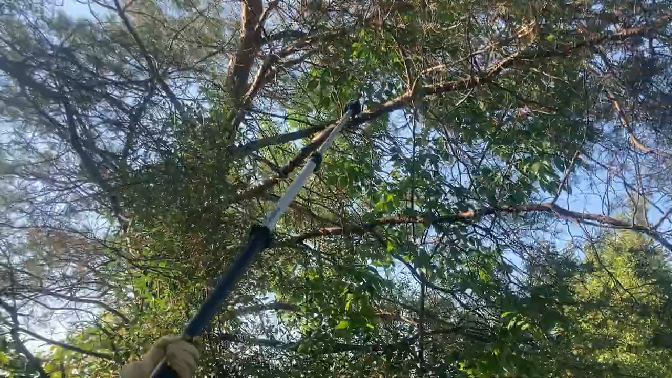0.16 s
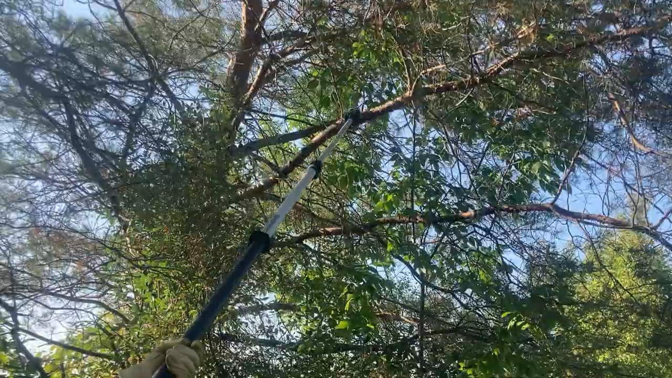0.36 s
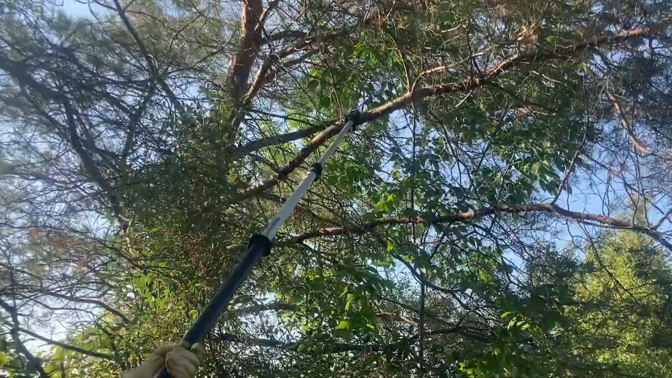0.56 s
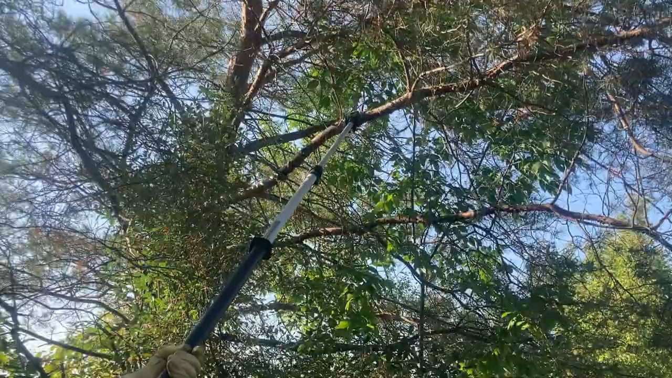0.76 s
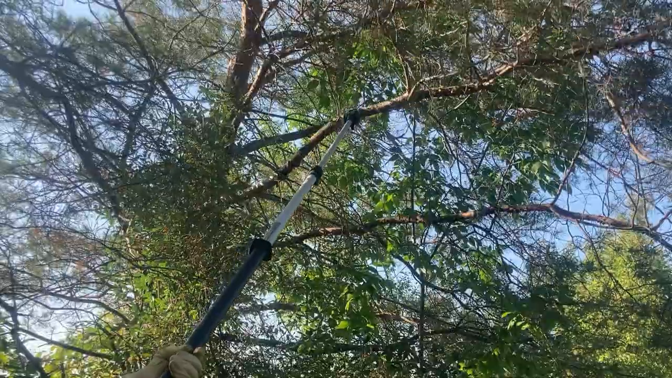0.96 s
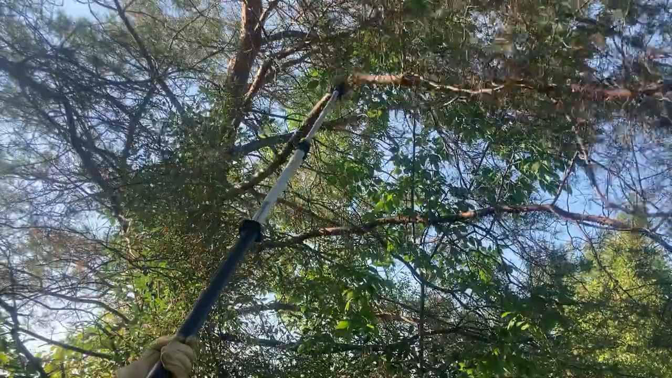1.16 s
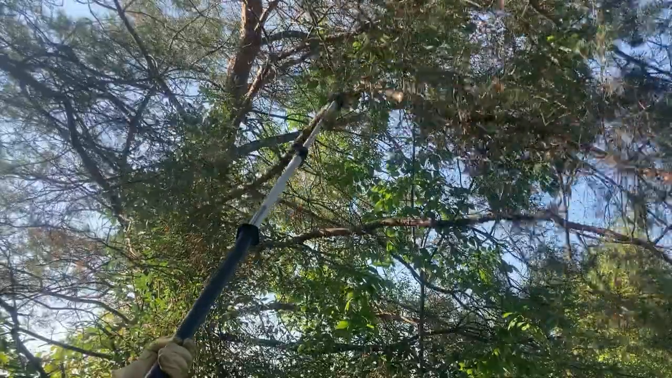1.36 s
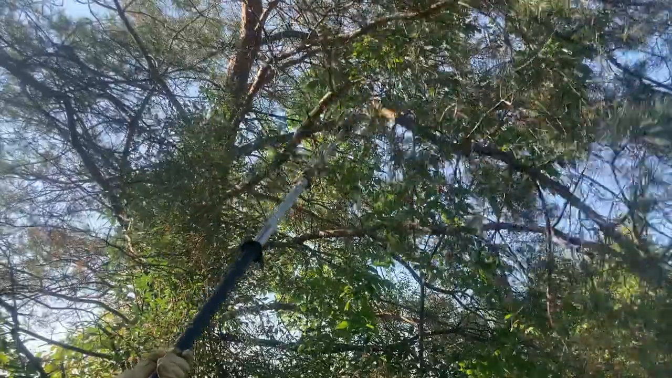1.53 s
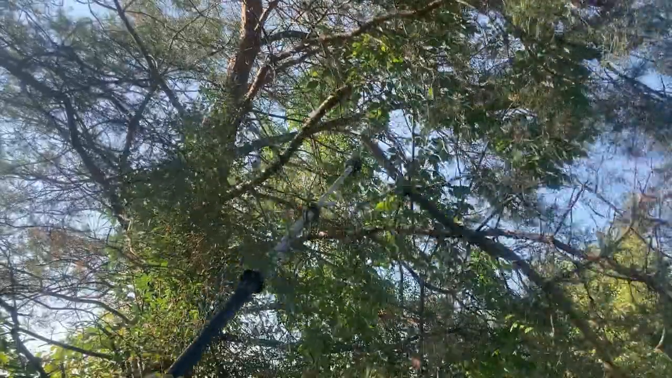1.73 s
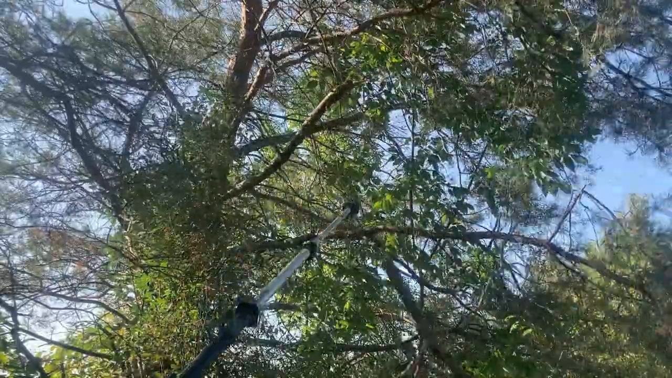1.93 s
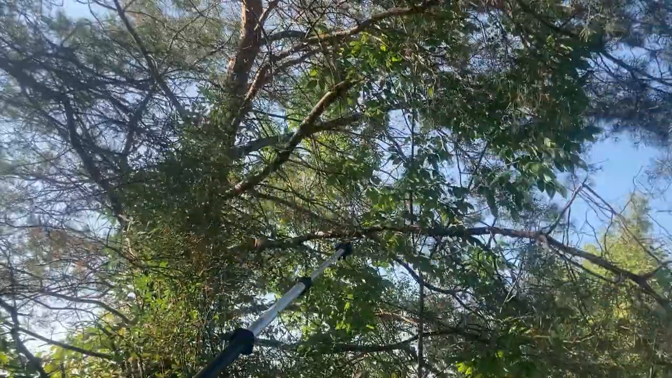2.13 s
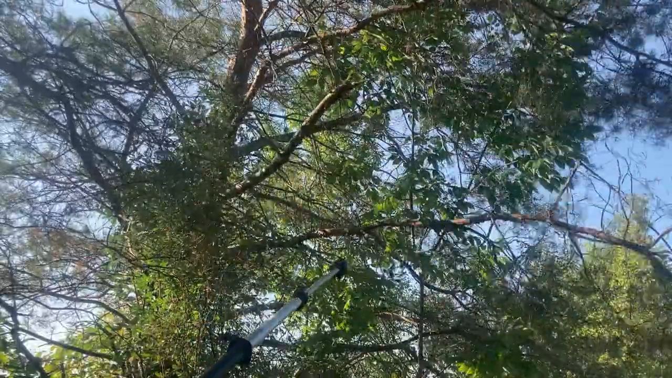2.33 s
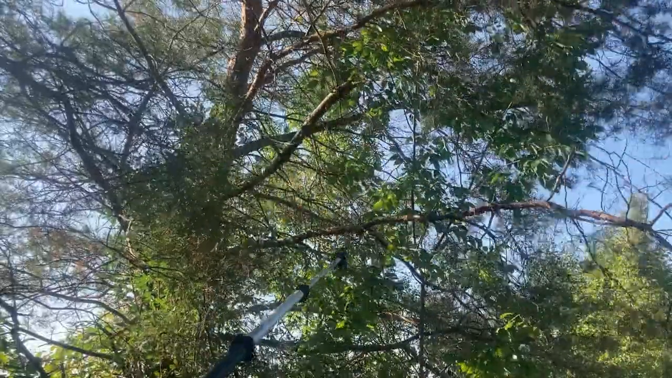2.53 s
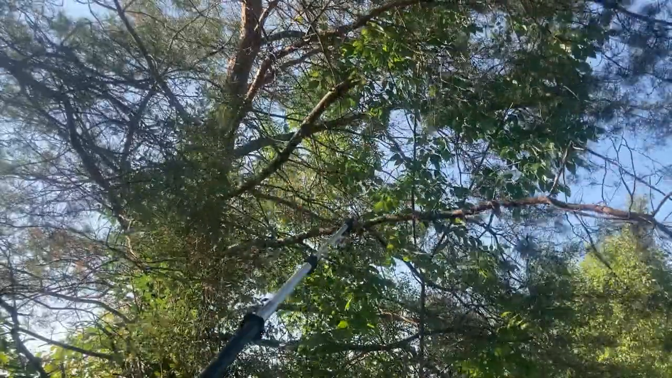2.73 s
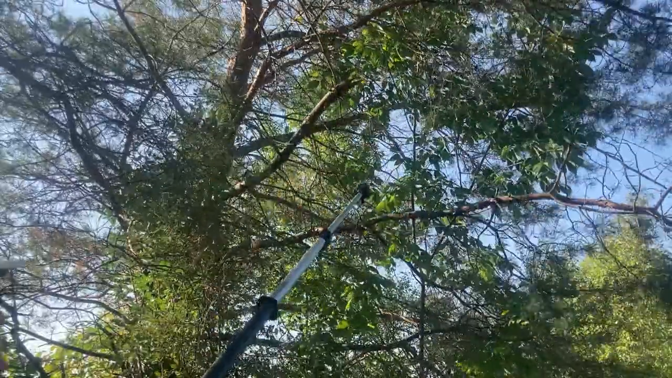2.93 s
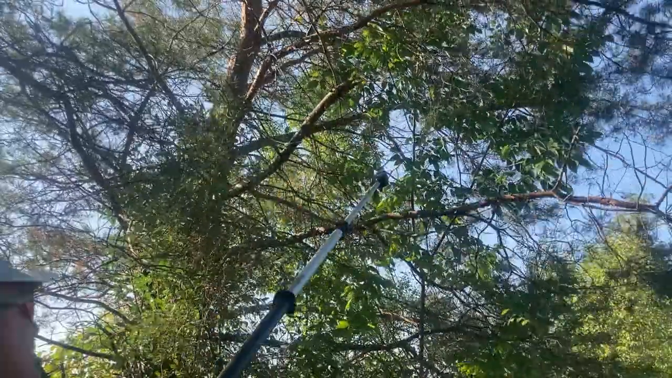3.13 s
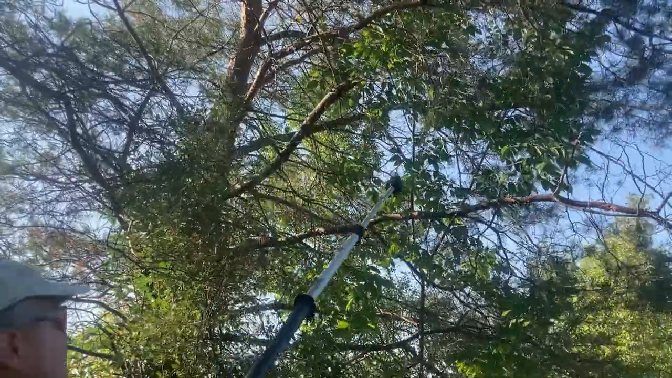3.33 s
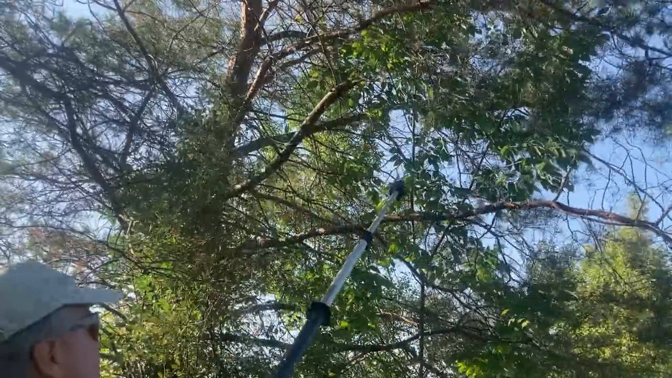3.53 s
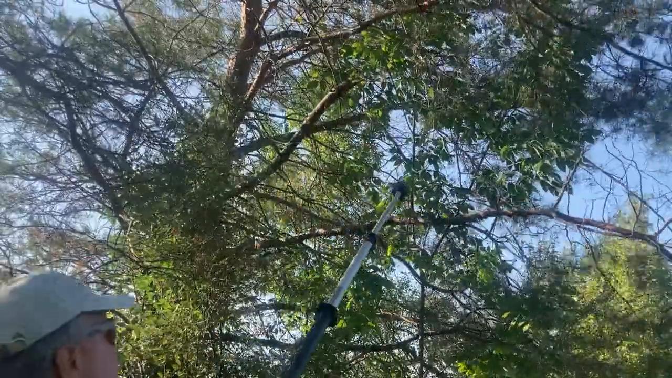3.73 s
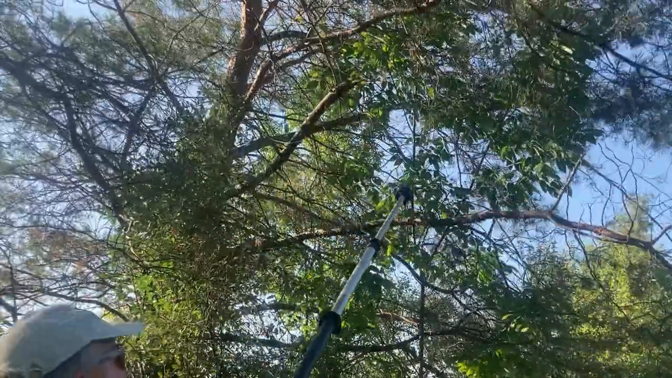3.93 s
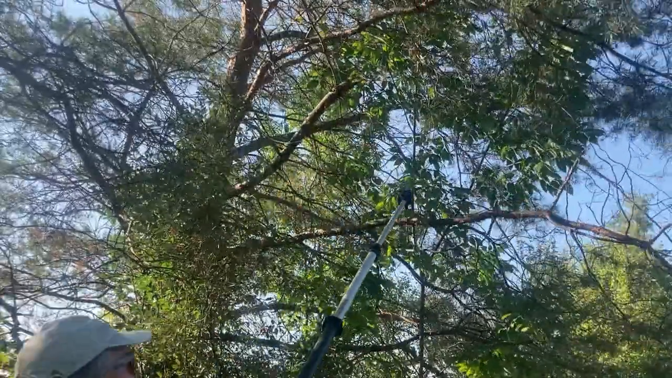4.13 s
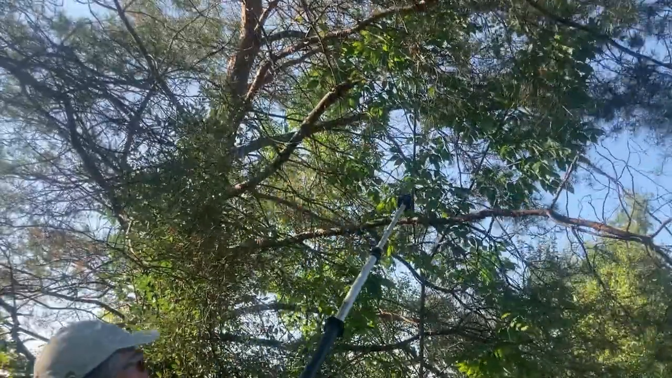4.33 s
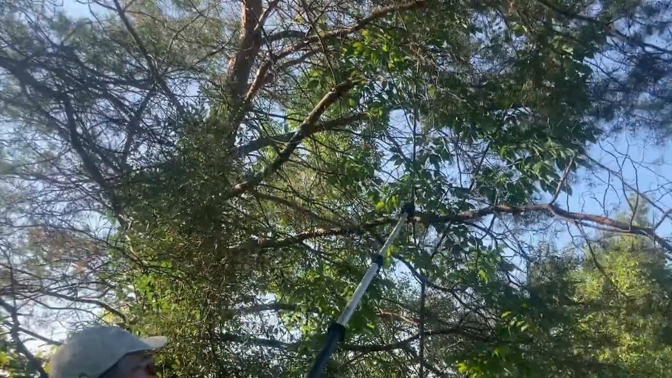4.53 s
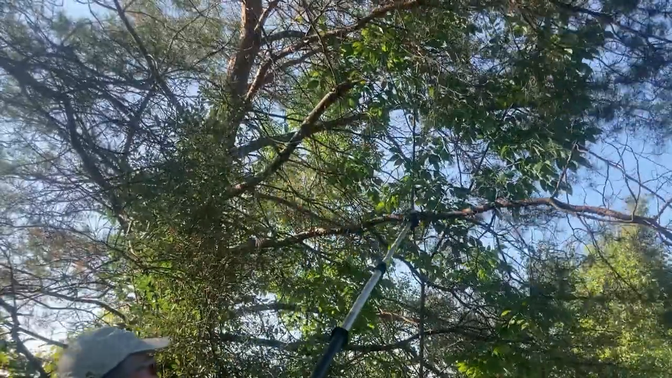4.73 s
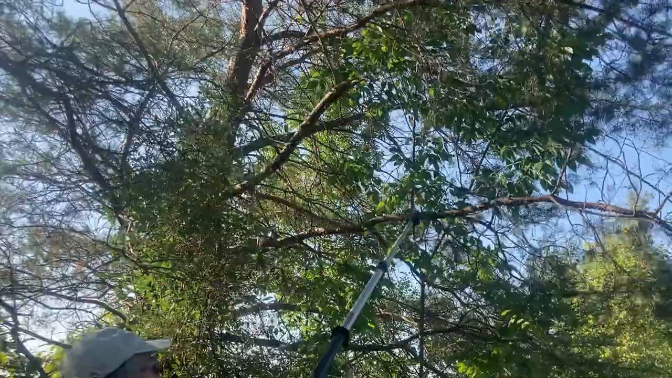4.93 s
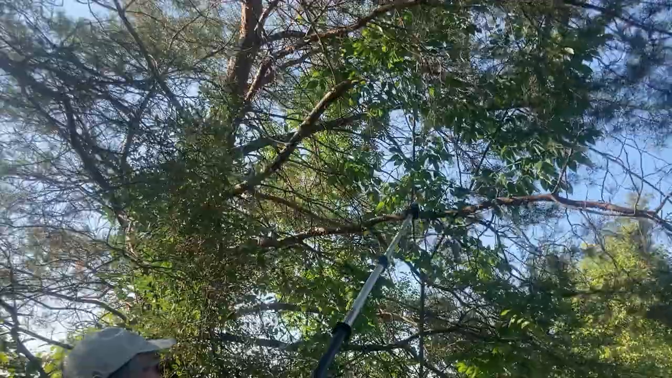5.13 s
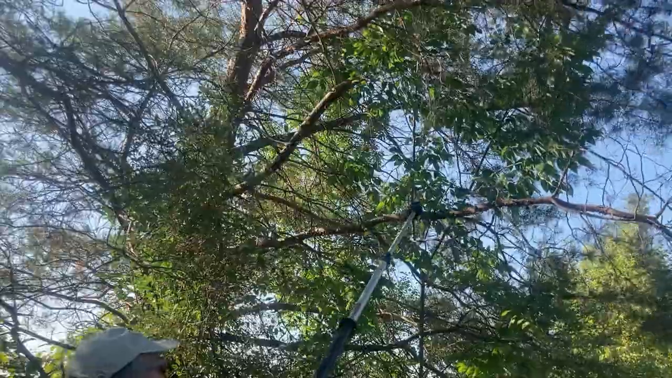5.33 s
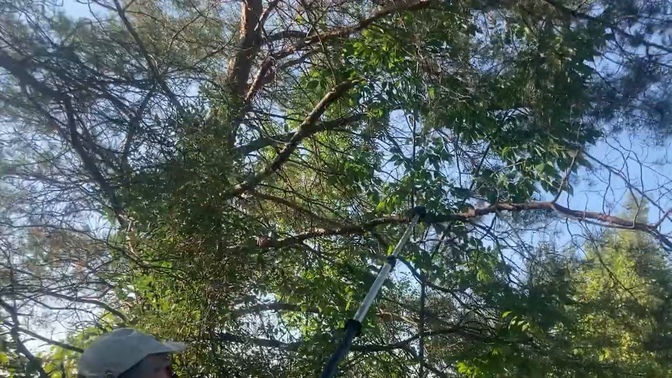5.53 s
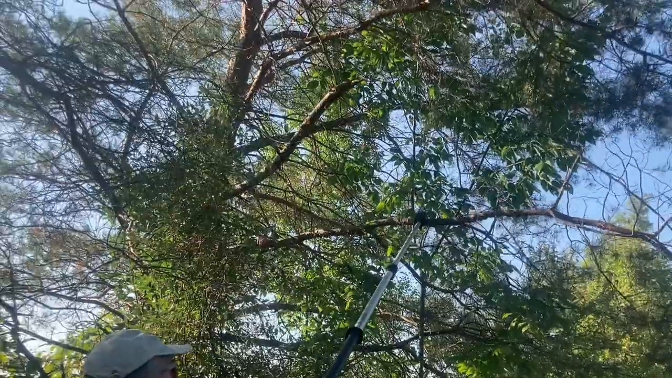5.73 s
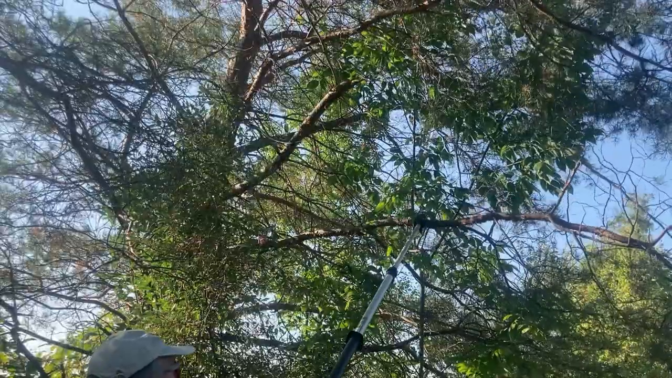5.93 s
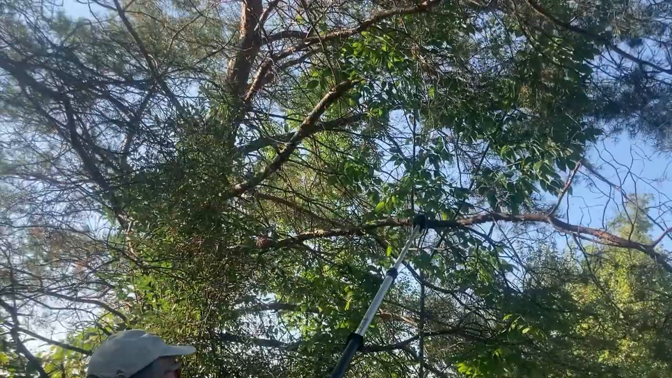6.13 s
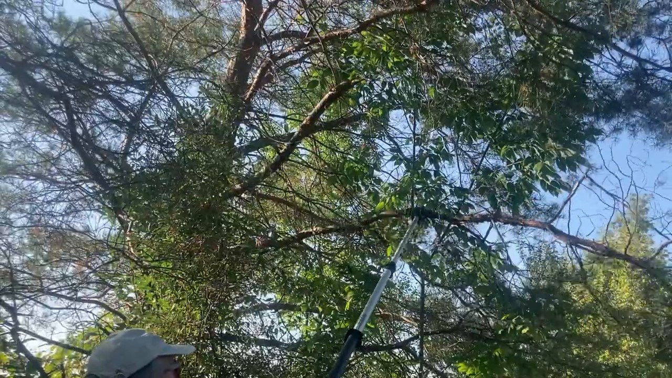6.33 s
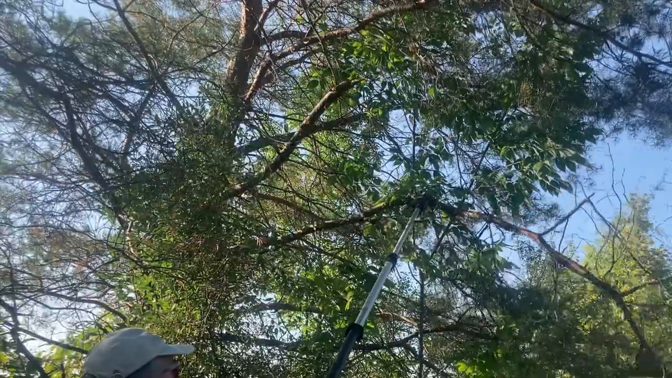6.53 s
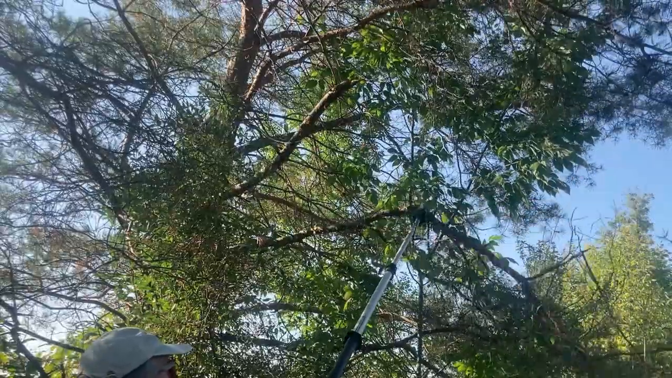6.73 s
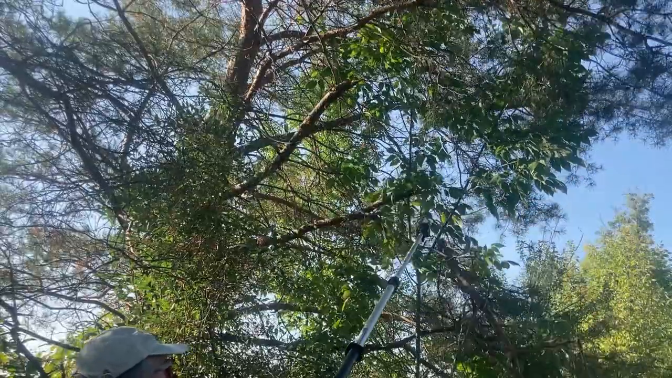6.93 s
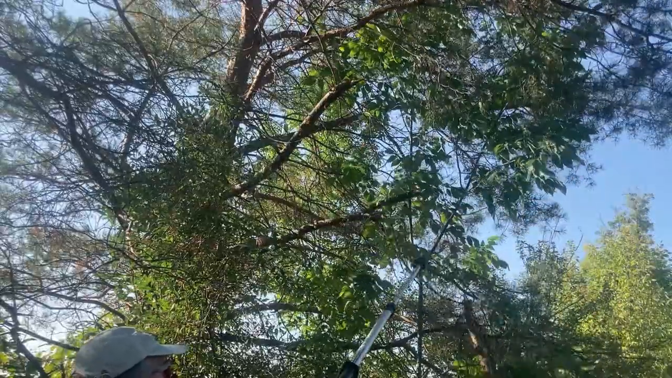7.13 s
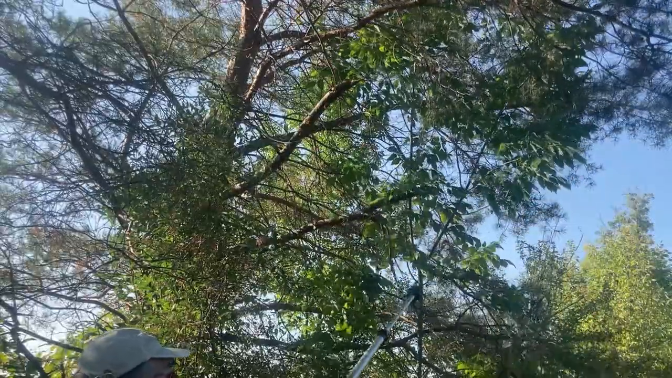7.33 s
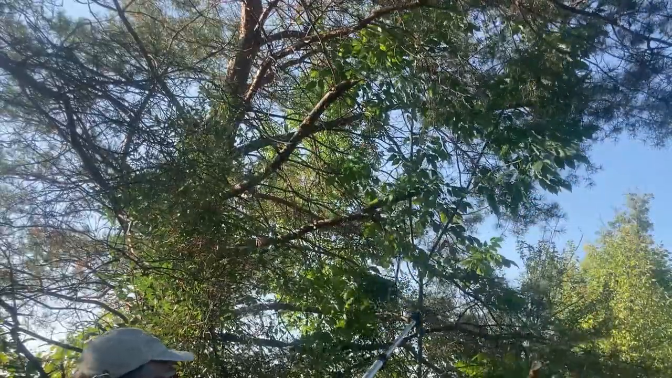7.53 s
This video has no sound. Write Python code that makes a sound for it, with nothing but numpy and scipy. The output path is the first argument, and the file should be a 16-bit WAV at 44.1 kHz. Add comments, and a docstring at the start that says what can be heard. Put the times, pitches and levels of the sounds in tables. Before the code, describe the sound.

Two bursts of an electric pole saw cutting overhead, with a high rattling whine, cracking wood and a branch crashing through foliage.

```python
"""In a quiet garden a cordless pole saw starts up and cuts a branch overhead. Chain links strike the
sprocket (the wheel that drives them), gears whine and the chain rattles along its bar; the pitch sags
under load. The wood cracks, the saw stops and the branch crashes down through the leaves. Twigs snap
as someone steps closer. A second, longer burst cuts another branch, which cracks and starts to fall."""
import sys
import numpy as np
from scipy import signal
from scipy.fft import rfft, irfft
from scipy.io import wavfile

SR = 44100
rng = np.random.default_rng(int(sys.argv[2]) if len(sys.argv) > 2 else 0)


def output_pcm(signal):
    """Save a mono or channel-first signal as 16-bit PCM at the path in sys.argv[1].

    Samples are clipped to [-1, 1] before scaling.
    """
    pcm = np.clip(np.atleast_2d(signal).T, -1, 1) * 32767
    wavfile.write(sys.argv[1], SR, np.round(pcm).astype(np.int16))


N = 334719
TIME = np.arange(N) / SR
FULL_SPEED_HZ = 650  # links a second

# links striking the sprocket, one curve a burst, from end of run-up to trigger release (t/s, rate/Hz)
LINK_RATES = [
    [(.405, 457.4), (.47, 532.7), (.6, 625), (.7, 624), (.85, 641.7), (1.15, 656), (1.43, 671.5)],
    [(4.955, 588.4), (5.03, 613.4), (5.2, 518.7), (5.31, 520.4), (5.4, 613), (5.6, 703.5), (5.7, 715.4),
     (6, 719), (6.1, 735.5), (6.3, 728.3), (6.58, 754.3), (6.72, 735.5), (7.13, 730), (7.17, 699.6)],
]
# teeth in the wood, one row a burst (start/s, end/s, chain noise boost/dB)
CUTS = [(0.445, 1.096, 4), (5.47, 7.04, 1.5)]
# the cut pinches the chain (t/s, width/s, drop in link rate/Hz, dip of the whine/dB)
PINCHES = [(1.067, 0.038, 23, 6), (5.811, .04, 22.6, 4), (6.389, .042, 65, 4), (6.626, 0.101, 2.06, 1),
           (6.821, .045, 48, 0)]


def undb(db):
    """Turn decibels into a gain."""
    return 10 ** (np.asarray(db) / 20)


def unit(x):
    """Scale to an average (rms) level of 1."""
    return x / np.sqrt(np.mean(x ** 2))


def curve(points):
    """Join (time, value) points with straight lines."""
    return np.interp(TIME, *np.transpose(points))


def during(points, fade_s=0.037):
    """1 from the first point to the last, fading to 0 outside."""
    return np.clip(np.minimum(TIME - points[0][0], points[-1][0] - TIME) / fade_s + 1, 0, 1)


def gate(start, end, fade_s):
    """1 between two times, with fades centred on them."""
    return np.clip(np.minimum(TIME - start, end - TIME) / fade_s + .5, 0, 1)


def swell(t, width):
    """A bell-shaped rise and fall around time t."""
    return np.exp(-.5 * ((TIME - t) / width) ** 2)


def swells(rows):
    """Add up one swell for each (time, width, level) row."""
    return sum(undb(db) * swell(t, width) for t, width, db in rows)


def bins(x):
    """The frequencies in the spectrum of x."""
    return np.maximum(np.arange(len(x) // 2 + 1) * SR / len(x), 1)


def colour(x, points):
    """Shape lows and highs by (frequency, level) points."""
    hz, db = np.transpose(points)
    return irfft(rfft(x) * undb(np.interp(np.log(bins(x)), np.log(hz), db)), len(x))


def band(x, low_hz, high_hz, order=2):
    """Keep the sound between two frequencies, scaled to level 1."""
    return unit(signal.sosfilt(signal.butter(order, [low_hz, high_hz], "band", fs=SR, output="sos"), x))


def ring(x, modes):
    """Let x ring an object with (frequency, width, level) resonances."""
    f = bins(x)
    response = sum(undb(db) / (1 + 1j * (f * f - hz * hz) / (f * width)) for hz, width, db in modes)
    return irfft(rfft(x) * response, len(x))


def wander(rate):
    """A random drift that turns about rate times a second."""
    return unit(np.interp(TIME * rate, np.arange(8000), rng.standard_normal(8000)))


def grains(rate, spread_db):
    """About rate tiny impacts a second, most weak and a few strong."""
    size = undb(spread_db * np.minimum(rng.exponential(size=N), 5))
    return unit((rng.random(N) < rate / SR) * size * rng.standard_normal(N))


def tone(cycles, db, flutter, flutter_rate=130, swell_db=2.6):
    """A machine tone that swells and flutters because no two teeth strike alike."""
    shake = 1 + flutter * (wander(flutter_rate) + 1j * wander(flutter_rate))
    wave = np.real(shake * np.exp(2j * np.pi * cycles)) / np.sqrt(.5 + flutter ** 2)
    return wave * undb(db + swell_db * wander(14))


def garden(air_db=-62, rumble_db=-67, dip_db=-20):
    """Faint outdoor hiss over a low rumble, which dips as the saw starts."""
    # colour of the outdoor hiss (f/Hz, level/dB)
    air_colour = [(120, -33), (200, -13), (298, -5.5), (702, -4), (812, -2), (1130, -10.5), (4920, -11.5),
                  (6020, -59), (7760, -4), (15500, -32)]
    # the rumble swells as each branch gives way and falls (t/s, width/s, level/dB)
    rumbles = [(1.09, 0.21, -55), (1.955, 0.096, -62), (6.59, 0.65, -59)]
    starting = sum(gate(rates[0][0] - .23, rates[0][0] + .043, .12) for rates in LINK_RATES)
    steady = band(rng.standard_normal(N), 56, 144) * undb(rumble_db + dip_db * starting)
    surges = band(rng.standard_normal(N), 60, 144) * swells(rumbles)
    air = unit(colour(rng.standard_normal(N), air_colour)) * undb(air_db)
    return (steady + surges) * undb(3.5 * wander(6)) + air


def thuds():
    """The falling branch and feet land dully on grass."""
    # landings (t/s, width/s, level/dB)
    landings = [(1.815, 0.011, -50.5), (1.925, 0.0098, -48), (2.05, 0.041, -67), (3.02, 0.021, -62),
                (3.335, 0.044, -56.5), (3.39, 0.037, -59)]
    # their dull colour (f/Hz, level/dB)
    thud_colour = [(47, -44), (80, -15), (269, -1), (811, -9), (891, -16), (1370, -13), (2000, -39),
                   (2600, -58), (4400, -120)]
    return unit(colour(grains(5000, 3.2), thud_colour)) * swells(landings)


def foliage(gain_db=-1.5, flicker_db=1.1):
    """Leaves and needles brush past each other in countless small ticks."""
    # swishing, one curve for each falling branch (t/s, level/dB)
    falls = [
        [(1.62, -48.5), (1.83, -31.5), (1.96, -33), (2.03, -30), (2.45, -40.5), (2.79, -47), (4.01, -49),
         (4.37, -55.5), (4.6, -65)],
        [(7.3, -39), (7.59, -41)],
    ]
    # colour of the leaves (f/Hz, level/dB)
    leaf_colour = [(88, -40), (150, -14.5), (314, -18.5), (540, -10), (966, -9.5), (2020, -7), (7410, -5),
                   (9180, -0.5), (10700, 0), (15500, -3.5)]
    ticks = grains(12000, 2.4) * undb(flicker_db * wander(35))
    level = sum(undb(curve(fall) + gain_db) * during(fall, fade_s=.065) for fall in falls)
    return unit(colour(ticks, leaf_colour)) * level


def tearing_wood():
    """Teeth snatch at the wood, and the first branch groans as it tears."""
    # snatches of the teeth (t/s, width/s, level/dB)
    snatches = [(1.033, .008, -23.5), (1.098, 0.017, -39), (6.34, 0.036, -27.5), (6.408, 0.0096, -22),
                (6.875, 0.015, -24.5), (6.966, .01, -30)]
    # their colour (f/Hz, level/dB)
    snatch_colour = [(80, -22), (250, -9), (700, -11), (1800, -6), (3300, 1), (4400, -4.5), (5500, -16),
                     (7700, -7), (15000, -33)]
    # groans of the branch (t/s, width/s, level/dB)
    groans = [(1.04, 0.024, -28.5), (1.1, 0.012, -26.5)]
    # their colour (f/Hz, level/dB)
    groan_colour = [(50, -14), (120, -14), (400, -2), (1000, 0.5), (1800, 4), (2600, -11), (6000, -53)]
    snatching = unit(colour(grains(4500, 4.6), snatch_colour)) * swells(snatches)
    groaning = unit(colour(grains(6000, 4), groan_colour)) * swells(groans)
    return snatching + groaning


def cracks(splinter_db=3, wood_db=4, gain_db=-1):
    """Fibres part in one bright snap that rings the wood; splinters follow and trees answer faintly."""
    # breaking wood and twigs (t/s, peak/dB, woody body/dB, splinter tail/dB)
    breaks = [(0.127, -23.5, -10, -26), (1.0298, -2.5, 6, -18), (1.0337, -8, -3, -19),
              (1.0357, -5.5, 9, -10), (1.0857, -3.5, 5, -18), (1.0969, -5.5, 5, -7), (1.2235, -3, -1, -13),
              (1.4655, -13, -3, -15), (1.7921, -10.5, 2, -21), (1.8343, -30, -4, -18),
              (1.8676, -18, -8, -10), (1.8938, -8, -13, -8.5), (1.9185, -12, -16, -12),
              (1.9695, -19.5, -14, -8), (2.0418, 0, 2, -22.5), (2.1053, -8, -5, -19.5),
              (2.2128, -18, -16, -13), (2.3419, -18, 7, -17), (2.8007, -8, -11.5, -15.5),
              (3.0068, -25.5, -9, -12), (3.6177, -13.5, -7, -13.5), (3.7449, -21.5, 6, -12),
              (4.103, -23.5, 11, -2), (4.1868, -27.5, -4, -23), (6.332, -8, 7, -6), (6.4031, -5, 8, -8),
              (6.9641, -7, 14, -6), (7.09, -6.5, 3, -12), (7.2068, -0.5, 9, -14.5)]
    # resonances of the wood (f/Hz, width/Hz, level/dB)
    wood_modes = [(930, 110, 8), (2130, 950, 11.5), (3450, 1400, 6.5), (4520, 3100, 8.5),
                  (7300, 2060, 15.5)]
    out, t = np.zeros(N + SR), TIME[:SR // 4]
    # the break crosses the fibres in under a millisecond
    snap = np.cos(2 * np.pi * (16000 * t - 1e7 * t * t)) * np.clip(1 - (t / .0008) ** 2, 0, 1)
    tail = np.exp(-t / .004) + undb(-14) * np.exp(-t / .035)
    for start_s, peak_db, body_db, tail_db in breaks:
        impact = snap + undb(tail_db + splinter_db) * rng.standard_normal(len(t)) * tail
        body = undb(body_db + wood_db) * unit(ring(impact, wood_modes))
        crack = band(impact, 9200, 10530, order=1) + body
        start = int(start_s * SR)
        out[start:start + len(t)] += crack / np.abs(crack).max() * undb(peak_db + gain_db)
    return out[:N]


def motion(burst, run_up_hz_per_s=1480, brake_hz_per_s=2600, tremble=.00232):
    """The motor runs up, sags at each pinch and is braked; its speed trembles slightly throughout."""
    rates = LINK_RATES[burst]
    run_up_end_s, release_s = rates[0][0], rates[-1][0]
    cut_start, cut_end, _ = CUTS[burst]
    run_up = run_up_hz_per_s * np.maximum(run_up_end_s - TIME, 0)
    braking = brake_hz_per_s * np.maximum(TIME - release_s, 0)
    sag = sum(drop_hz * swell(t, width) for t, width, drop_hz, _ in PINCHES)
    link_hz = np.maximum(curve(rates) - run_up - braking - sag, 0) * (1 + tremble * wander(45))
    # each of these runs from 0 (no) to 1 (yes)
    full_sound = gate(run_up_end_s, np.inf, .03)
    cutting = gate(cut_start, cut_end, .33)
    coasting = gate(release_s, np.inf, .033)
    return link_hz, full_sound, cutting, coasting


def clatter():
    """Loose links knock on the bar as the chain starts and as it settles."""
    # spells of knocking (start/s, length/s, level/dB)
    knocks = [(0.072, 0.06, -49.5), (0.323, 0.069, -47), (4.515, 0.12, -52), (4.653, 0.11, -51.5),
              (4.855, 0.066, -43.5), (7.296, .14, -43.5), (7.44, .2, -50)]
    # their colour (f/Hz, level/dB)
    knock_colour = [(100, -41), (300, -8), (750, 1), (1700, -2), (2600, -8), (4400, -6.5), (6000, -12.5),
                    (15000, -15)]
    level = sum(undb(db) * gate(t, t + length, .01) for t, length, db in knocks)
    return unit(colour(grains(5000, 1.8), knock_colour)) * level


def flap(state):
    """As the chain first gathers speed, every second link slaps the bar and the rivets sing."""
    # rise and fall of the flapping (t/s, level/dB)
    loudness = [(.40, -70), (.43, -54), (.5, -35), (.57, -44), (.64, -46)]
    # its tones (multiple of the slap rate, level/dB)
    slap_tones = [(1, -6.5), (15, 1), (18, -7), (22, -3)]
    link_hz, *_ = state
    slaps = np.cumsum(link_hz) / SR / 2
    return sum(tone(k * slaps, curve(loudness) + db, flutter=.4) for k, db in slap_tones) * during(loudness)


def chain(burst, state, lag_s=.031, run_up_db=-30, surge_db=4, settle_s=.16):
    """Tiny impacts ring the bar and housing, louder at speed and in the wood."""
    # base levels, one row a burst (bar rattle/dB, tooth rasp/dB, chain hiss/dB)
    levels = [(-35, -33, -31.5), (-35, -31.5, -29.5)]
    # colour of the running chain, one curve a burst (f/Hz, level/dB)
    chain_colours = [
        [(100, -49), (200, -10), (300, -13.5), (420, -3), (800, 1.5), (1200, 0), (1800, 1.5), (2400, -11.5),
         (3300, -6), (4500, -4.5), (5500, -9.5), (7500, -4), (10500, -2), (15500, -7)],
        [(100, -33), (200, -11.5), (300, -6), (420, -5.5), (800, -1), (1200, -2.5), (1800, -1), (2400, -2),
         (3000, -2), (4200, 4.5), (5400, -2.5), (7500, 5), (10500, 6.5), (15500, 2)],
    ]
    # resonances of bar and gear housing (f/Hz, width/Hz, level/dB)
    housing_modes = [(315, 13, 0), (1110, 34, -7), (1830, 65, 1.5), (2585, 54, -4.5), (4350, 76, -6)]
    link_hz, full_sound, cutting, _ = state
    rattle_db, rasp_db, hiss_db = levels[burst]
    _, _, boost_db = CUTS[burst]
    lag = np.exp(-1 / (lag_s * SR))  # the shaking trails the speed
    shaking = signal.lfilter([1 - lag], [1, -lag], link_hz / FULL_SPEED_HZ + 1e-9)
    links = np.cumsum(link_hz) / SR
    # impacts bunch at every link and at every cutting tooth, four links apart
    bunching = (1 + .06 * np.cos(2 * np.pi * links)) * (1 + .028 * np.cos(2 * np.pi * links / 4))
    impacts = grains(30000, .43) * bunching * undb(.71 * wander(60))
    body = colour(impacts + ring(impacts, housing_modes), chain_colours[burst])
    rattle = band(body, 110, 2660, order=4) * undb(rattle_db) * shaking ** .7
    rasp = band(body, 2194, 7760, order=7) * undb(rasp_db) * shaking ** .98
    ticks = colour(grains(30000, .36) * bunching, chain_colours[burst])
    hiss = band(ticks, 7930, 15700, order=12) * undb(hiss_db) * shaking ** 1.2
    # the run-up is mostly hiss; rattle and rasp then come in suddenly, briefly louder
    running = (rattle + rasp) * undb(run_up_db * (1 - full_sound)) + hiss
    surge = full_sound * np.exp(-np.cumsum(full_sound) / SR / settle_s)
    return running * undb(boost_db * cutting + surge_db * surge)


def whine(burst, state, run_up_db=-20, turns_per_link=.4332, gear_teeth=12):
    """Links beat on the sprocket, driven by a motor through gears; a pinch smothers every tone."""
    # base levels, one row a burst (link tones 1, 2, 3/dB, overtones/dB, gears/dB, motor/dB)
    levels = [(-46, -45.5, -45, -49, -37.5, -44), (-43.5, -43, -41.5, -39.5, -37.5, -46)]
    # overtones of the links (multiple of the link rate, level/dB)
    link_overtones = [(4, 0.5), (5, -5), (6, -4), (7, -10.5), (9, -6)]
    # drone of the motor (multiple of its turning rate, level/dB)
    motor_tones = [(1, -29), (3, -2), (5, -1.5), (9, -2.5)]
    # resonances that lift a tone gliding through them (f/Hz, width/Hz, level/dB)
    peaks = [(543, 99, 7), (751.7, 29.5, 9), (1074, 170, 6.5), (1448, 31, 3), (1617, 120, 14.5),
             (1882, 75, 12.5), (2161, 73, 6), (3320, 330, 0)]

    def lift(hz):
        """The gain that the resonances give a tone at this pitch."""
        return 1 + sum(undb(db) / (1 + (2 * (hz - f) / width) ** 2) for f, width, db in peaks)

    link_hz, full_sound, cutting, coasting = state
    *beat_dbs, overtone_db, gear_db, motor_db = levels[burst]
    links = np.cumsum(link_hz) / SR
    turns = turns_per_link * links
    rough = coasting + 1 - full_sound  # the tones are rough while running up or coasting
    beat = sum(tone(k * links, db, flutter=.22 + .42 * rough, swell_db=3) * lift(k * link_hz)
               for k, db in enumerate(beat_dbs, 1))
    overtones = sum(tone(k * links, overtone_db + db, flutter=.41) for k, db in link_overtones)
    motor = sum(tone(k * turns, motor_db + db, flutter=.34) for k, db in motor_tones)
    gears = tone(gear_teeth * turns, gear_db - 3, flutter=.5 + rough, flutter_rate=220)
    gears *= lift(gear_teeth * turns_per_link * link_hz)
    gears *= np.minimum(link_hz / 290, 1)  # gears sound even at low speed
    # cutting brings out the gears and overtones
    gears *= undb(-3 * (1 - cutting) * (1 - rough) - 10 * rough)
    tones = (beat + motor) * undb(-2.5 * cutting) + overtones * undb(-7 * (1 - cutting))
    tones *= (link_hz / FULL_SPEED_HZ) ** 1.34
    pinch_db = sum(dip_db * swell(t, width) for t, width, _, dip_db in PINCHES)
    return (tones + gears) * undb(run_up_db * (1 - full_sound) - pinch_db)


def noises(states):
    """All that rumbles, rustles and rattles, with fresh randomness on each call."""
    chains = sum(chain(burst, state) for burst, state in enumerate(states))
    return garden() + thuds() + foliage() + tearing_wood() + clatter() + chains


def scene(echo_s=.018):
    """All sources lie ahead; trunks and branches scatter part of their sound to the sides."""
    # scattered sound compared with direct sound (f/Hz, level/dB)
    scatter_colour = [(60, -10), (300, -9), (700, -5), (1300, -7), (2500, -4), (5000, -4), (8000, -10),
                      (15000, -11)]
    states = [motion(burst) for burst in range(len(CUTS))]
    whines = sum(whine(burst, state) for burst, state in enumerate(states))
    distinct = cracks() + flap(states[0]) + whines
    echoes = rng.standard_normal(SR // 8) * np.exp(-TIME[:SR // 8] / echo_s)
    scattered = signal.fftconvolve(distinct, echoes / np.linalg.norm(echoes))[:N]
    direct = distinct + noises(states)
    side = colour(scattered + noises(states), scatter_colour)
    return np.array([direct + side, direct - side])


def record(dry, top_hz=15850):
    """Left and right are out of step in the treble and near 740 Hz, widening the sound; the top is cut."""
    # how far left and right are out of step (f/Hz, phase/radians)
    phase_gap = [(0, 0), (630, 0), (740, 2.1), (900, 0), (2600, 0), (3500, .8), (5400, -1.1), (6900, 0),
                 (9200, -3.14), (13550, -9.42), (22050, -21.5)]
    shift = np.exp(.5j * np.interp(bins(dry[0]), *np.transpose(phase_gap)))
    channels = irfft(rfft(dry) * np.array([shift, 1 / shift]), N)
    return signal.sosfilt(signal.ellip(10, .2, 80, top_hz, fs=SR, output="sos"), channels)


dry = scene()
out = record(dry)
output_pcm(out)
```